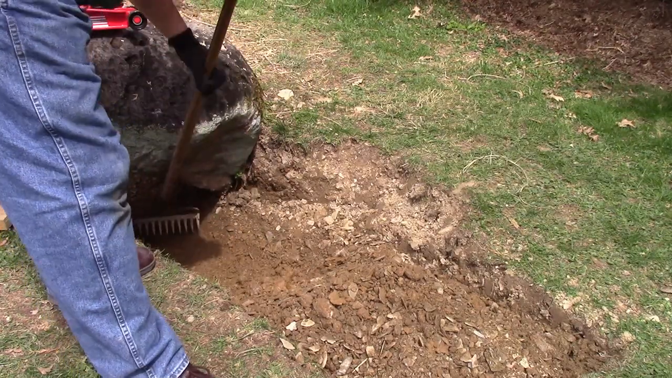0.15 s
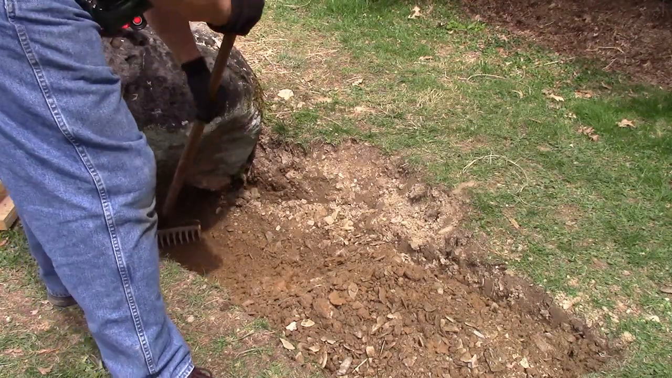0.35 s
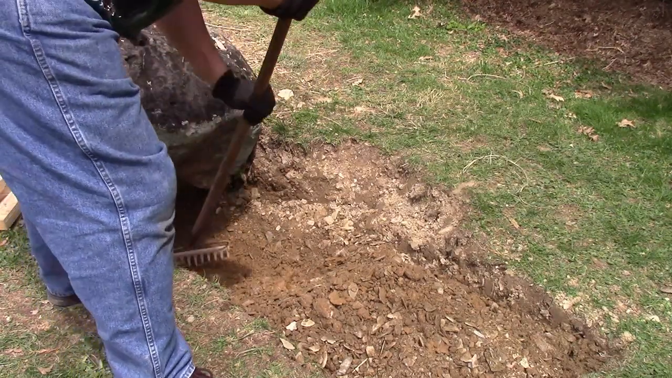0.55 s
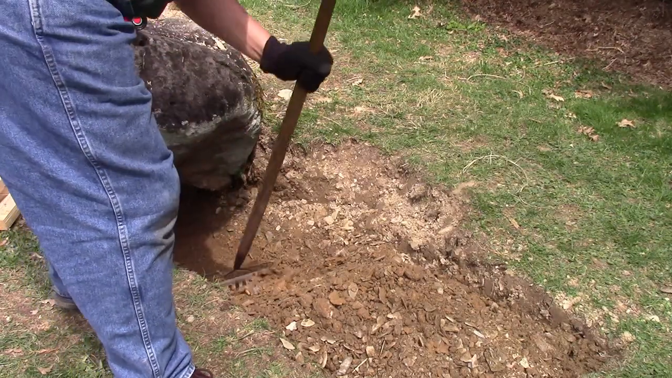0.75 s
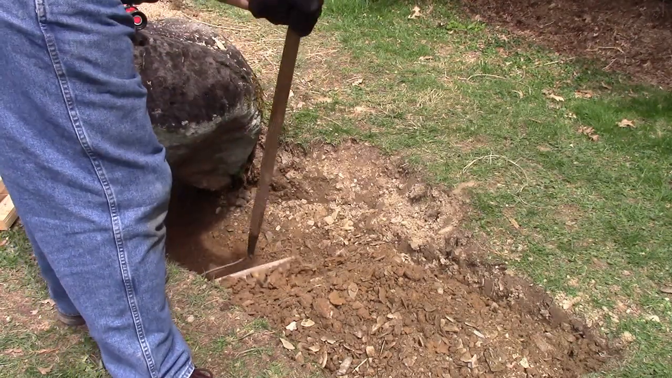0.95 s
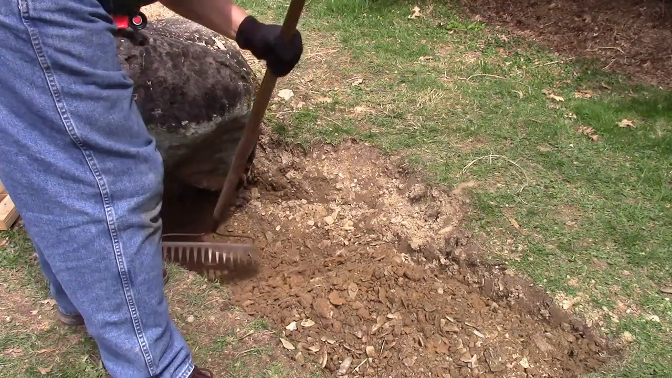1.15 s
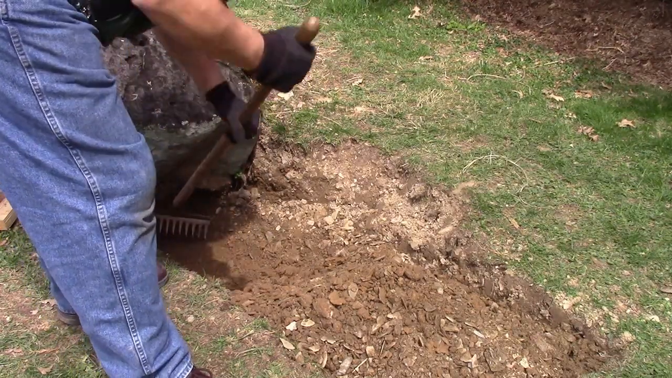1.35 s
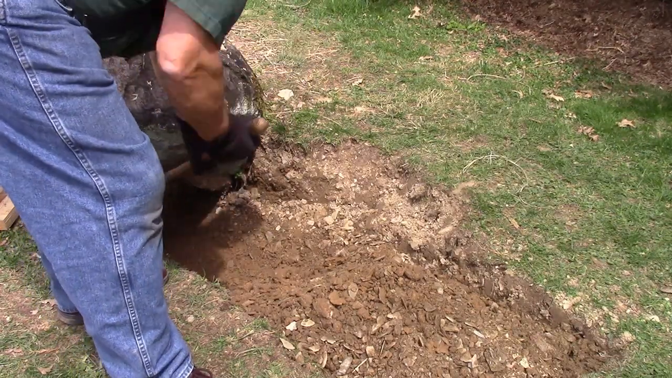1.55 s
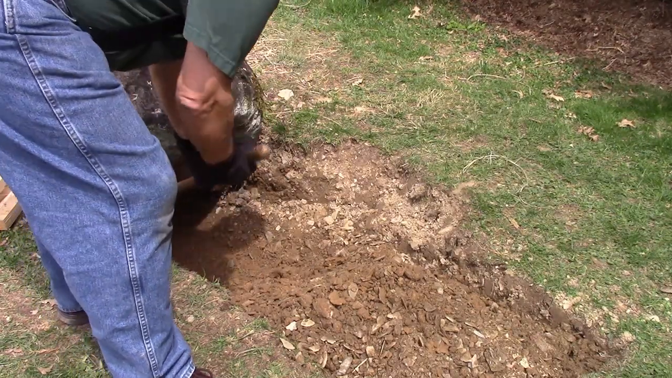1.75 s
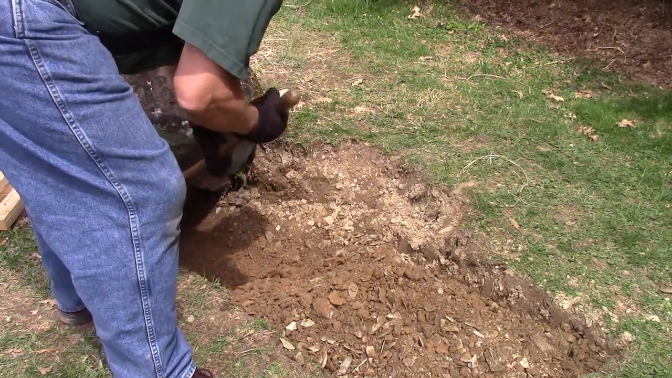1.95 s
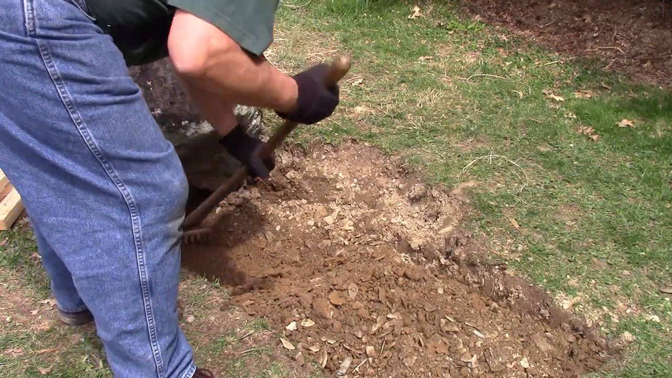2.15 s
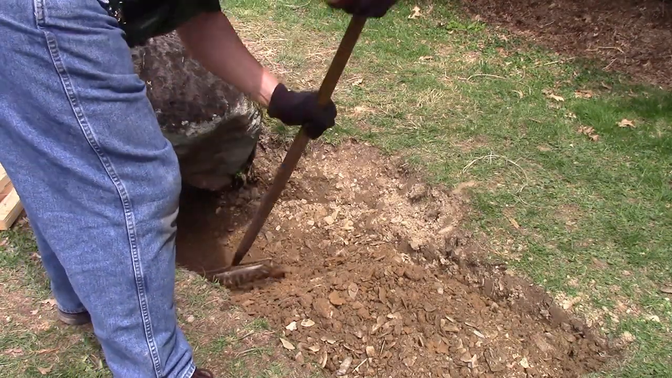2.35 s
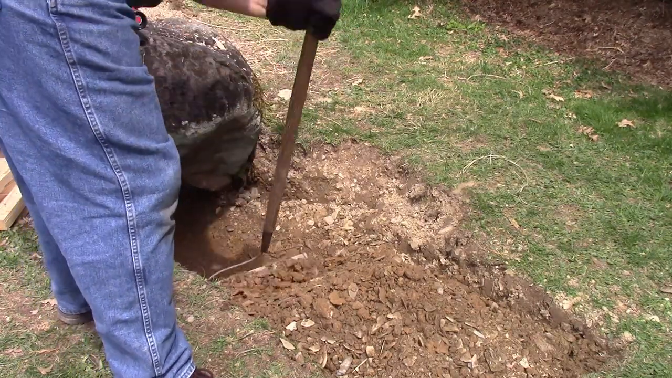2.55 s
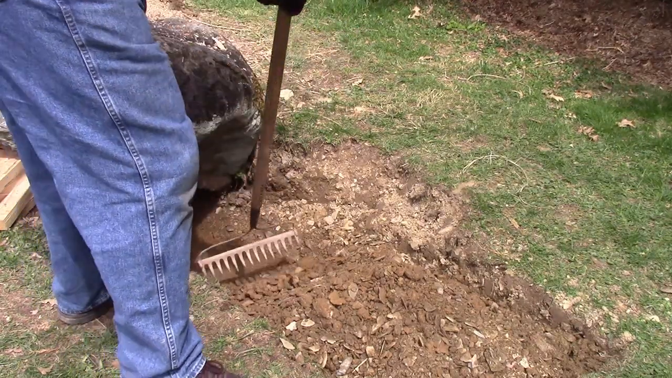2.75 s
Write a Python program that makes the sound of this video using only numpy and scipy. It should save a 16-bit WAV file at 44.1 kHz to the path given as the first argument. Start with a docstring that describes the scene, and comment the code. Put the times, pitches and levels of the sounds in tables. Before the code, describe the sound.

Close outdoor sound of a steel garden rake: one woody, metallic knock, a crunchy scrape with clicking pebbles, a near-quiet gap with light touches, then a second rasping stroke over stones, against soft yard air.

```python
"""Raking stony dirt

A steel rake on a wooden handle knocks down on hard ground, then is pulled twice through dry, stony dirt.
Streams of tiny impacts rub the tines and excite the rake's modes; denser bursts are stones that catch. Decaying
sines are slips off stones; snaps of filtered noise are pebbles; between the pulls a few stones crunch and
pebbles click. Faint bands of hiss swish, and shaped noise gives the quiet air of an open yard."""
import sys
import numpy as np
from scipy import signal
from scipy.fft import rfft, irfft
from scipy.io import wavfile
from scipy.ndimage import uniform_filter1d

SR = 44100
rng = np.random.default_rng(int(sys.argv[2]) if len(sys.argv) > 2 else 0)


def dump_mix(stems):
    """Bounce the given channels to the path in sys.argv[1] as a 16-bit WAV at rate SR."""
    frames = np.atleast_2d(stems).T  # one column per channel
    limited = np.clip(frames, -1, 1)  # hard clip at full scale
    pcm = np.round(limited * 32767).astype(np.int16)
    wavfile.write(sys.argv[1], SR, pcm)


N = 121275  # 2.75 s


def undb(db):
    """Amplitude factor of a level in dB."""
    return 10 ** (np.asarray(db) / 20)


def unit(x):
    """Scale to an RMS of 1."""
    return x / np.sqrt(np.mean(x ** 2) + 1e-20)


def band(x, lo_hz, hi_hz, order=3):
    """Causal band-pass."""
    edges = [lo_hz, min(hi_hz, SR / 2 - 1000)]
    sos = signal.butter(order, edges, "band", fs=SR, output="sos")
    return signal.sosfilt(sos, x + 1e-18)


def gains(points):
    """Gain at each frequency of the whole sound, from (f/Hz, level/dB) points."""
    hz, db = np.array(points).T
    log_hz = np.log(np.fft.rfftfreq(N, 1 / SR) + 1)
    return undb(np.interp(log_hz, np.log(hz), db))


def colour(x, points):
    """Causal minimum-phase filter that follows (f/Hz, level/dB) points."""
    cepstrum = irfft(np.log(gains(points)), N)
    # folding the cepstrum forward in time makes the filter causal
    cepstrum[1:N // 2] *= 2
    cepstrum[N // 2:] = 0
    return irfft(rfft(x) * np.exp(rfft(cepstrum)), N)


def walk(rate):
    """Smooth random wander with an RMS near 1, taking `rate` new values per second."""
    k = max(int(SR / rate), 2)
    steps = np.repeat(rng.standard_normal(N // k + 1), k)
    return unit(uniform_filter1d(steps, k)[:N])


def grains(per_s, spread_db, size):
    """Random tiny impacts, a few much larger than the rest."""
    when, strength, side = rng.random((size, 3)).T
    hit = when < per_s / SR
    return hit * undb(-spread_db * np.log(strength + 0.0092)) * np.sign(side - 0.5)


def add(out, start_s, x):
    """Mix x into out from start_s on."""
    i = max(int(start_s * SR), 0)
    out[i:i + len(x)] += x[:len(out) - i]


def tail(decay_s, size=16384):
    """Scattered reflections: noise that dies away, with unit energy."""
    fade = np.exp(-np.arange(size) / SR / decay_s)
    return unit(rng.standard_normal(size) * fade) / np.sqrt(size)


# spectrum of the outdoor air: (f/Hz, relative level/dB per Hz)
AIR_SPECTRUM = [(25, -3), (50, -4.5), (90, -13), (125, -7), (190, -9), (330, -19), (900, -22), (1750, -21),
                (5000, -30.5), (10000, -35.5), (15500, -43)]
AIR_DB, AIR_SIDE_DB = -48.5, -5.5  # the side is relative to the mid
AIR_WANDER_DB, AIR_WANDER_PER_S = 0.83, 3.37


def air():
    """Low rumble and faint hiss of the open yard: shaped noise whose level wanders, spread wide."""
    def layer():
        noise = unit(colour(rng.standard_normal(N), AIR_SPECTRUM))
        return noise * undb(AIR_WANDER_DB * walk(AIR_WANDER_PER_S))

    mid, side = layer(), layer()
    return undb(AIR_DB) * (mid + undb(AIR_SIDE_DB) * side * np.array([[1], [-1]]))


# thin whistles and swishes around the pulls: (start t/s, length t/s, centre f/Hz, width f/Hz, level/dB)
SWISH_EVENTS = [(0.907, 0.13, 4490, 170, -58.5), (0.968, 0.18, 3100, 550, -56),
                (1.1, 0.086, 2465, 49.7, -60.5), (1.125, .24, 1673, 109, -61),
                (1.861, 0.098, 4050, 1000, -53)]


def swishes():
    """Faint whistles and narrow bands of hiss that swell and fade."""
    out = np.zeros(N)
    for start, length, hz, width_hz, db in SWISH_EVENTS:
        n = int(length * SR)
        noise = rng.standard_normal(N)
        hiss = unit(band(noise, hz - width_hz / 2, hz + width_hz / 2, order=2)[-n:])
        swell = np.sqrt(2) * np.sqrt(np.hanning(n))  # keeps the average power
        add(out, start, undb(db) * hiss * swell)
    return out


# pebbles: (start t/s, peak level/dB, centre f/Hz, crumble decay t/s)
PEBBLE_CLICKS = [(0.772, -30, 12350, .001), (0.826, -18, 3500, 0.00058), (0.878, -26.5, 6100, 0.00059),
                 (1.0055, -17, 4880, 0.002), (1.004, -23, 1430, 0.0037), (1.2588, -21.5, 3150, 0.00049),
                 (2.4945, -21, 8000, .0007)]
CLICK_WIDTH = 1.63  # ratio of either band edge to the centre
BOUNCE_S, BOUNCE_DB = 0.0047, -12
CRUMBLE_DB = -14.5  # noise against the snap


def pebbles(size=2000):
    """Dry clicks (a snap and a brief crumble), each with one small bounce."""
    out, t = np.zeros(N), np.arange(size) / SR
    for start, db, hz, decay in PEBBLE_CLICKS:
        for delay, drop_db in ((0, 0), (BOUNCE_S, BOUNCE_DB)):
            crumble = rng.standard_normal(size) * np.exp(-t / decay)
            snap = signal.unit_impulse(size) + undb(CRUMBLE_DB) * crumble
            click = band(snap, hz / CLICK_WIDTH, hz * CLICK_WIDTH)
            add(out, start + delay, undb(db + drop_db) * click / np.abs(click).max())
    return out


# slips off single stones and clods: (peak t/s, envelope peak level/dB, pitch f/Hz)
STRIKE_EVENTS = [(0.303, -32, 3680), (0.307, -25.5, 932), (0.313, -32, 600), (0.318, -28, 1296),
                 (0.486, -30, 930), (0.571, -17.5, 930), (0.671, -21, 1457), (0.677, -22.5, 886),
                 (0.712, -19, 977), (0.752, -28.5, 2860), (0.784, -25.5, 2810), (0.813, -22, 1605),
                 (1.715, -27, 2850), (2.194, -25.5, 1380), (2.287, -21.5, 2980), (2.294, -25, 178),
                 (2.37, -23, 201), (2.376, -25, 1300), (2.411, -17.5, 2800), (2.486, -17.5, 1167),
                 (2.494, -19.5, 1206), (2.505, -21, 7790)]
STRIKE_DECAY_S, STRIKE_DECAY_POWER = 0.0044, 0.43  # decay at 1 kHz; how fast it shortens with pitch
STRIKE_RISE_SHARE = 0.52  # rise as a share of the decay


def strikes():
    """A tine slips off a stone or a clod: a brief knock at one pitch, shorter the higher it is."""
    out, t = np.zeros(N), np.arange(N) / SR
    for when, db, hz in STRIKE_EVENTS:
        decay = STRIKE_DECAY_S * (hz / 1000) ** -STRIKE_DECAY_POWER
        age = (t - when) / decay
        swell = np.exp(-np.where(age < 0, (age / STRIKE_RISE_SHARE) ** 2, age))
        out += undb(db) * swell * np.sin(2 * np.pi * hz * (t - when))
    return out


# modes of handle and head: (f/Hz, relative level/dB when knocked, relative level/dB when scraped, t60 t/s)
RAKE_MODES = [(192, -31, -0.5, 0.1), (246, -14.5, -3.5, 0.25), (486, -14, -7.5, 0.41),
              (693.5, -3.5, -8.5, 0.017), (799, -11, -12, 0.0069), (918, -1.5, -3.5, 0.18),
              (1184, 0, -11, 0.045), (1392, -3, -20, 0.083), (1509, -8, -12, 0.033),
              (1826, -4.5, -14, 0.03), (2394, -4, -54, 0.044), (2840, -28, -9, 0.15),
              (3180, -11.5, -13, 0.093)]
# the head lands: (start t/s, level/dB)
KNOCK_EVENTS = [(0.2018, -15.5)]
KNOCK_RISE_S, KNOCK_HOLD_S, KNOCK_FALL_S = 0.0026, 0.014, 0.0068
KNOCK_CHATTER_DB, KNOCK_CHATTER_PER_S = 3, 460
KNOCK_RING_DB = -10  # free ring against the contact


def knocks():
    """The head chatters on the ground for a moment, then the rake rings on weakly in its modes."""
    out, t = np.zeros(N), np.arange(SR // 2) / SR
    chatter = undb(KNOCK_CHATTER_DB * walk(KNOCK_CHATTER_PER_S)[:len(t)])
    contact = np.exp(-np.maximum(t - KNOCK_HOLD_S, 0) / KNOCK_FALL_S) * chatter
    for start, db in KNOCK_EVENTS:
        knock = np.zeros(len(t))
        for hz, mode_db, _, t60 in RAKE_MODES:
            free_ring = undb(KNOCK_RING_DB) * 1000 ** (-t / t60)
            tone = np.sin(2 * np.pi * (hz * t + rng.random()))
            knock += undb(mode_db) * tone * (contact + free_ring)
        knock *= np.minimum(t / KNOCK_RISE_S, 1)
        add(out, start, undb(db) * knock / np.std(knock[t < KNOCK_HOLD_S]))
    return out


# spectrum of one grain on a tine: (f/Hz, relative level/dB per Hz)
GRIT_SPECTRUM = [(70, -32), (190, 2), (320, -6.5), (600, -0.5), (950, 3.5), (1400, -4), (1900, -10.5),
                 (3000, -11), (5000, -15), (8000, -24), (11000, -32), (16000, -46.5)]
# the rake rings more freely while sliding than when a stone holds it
DRAG_RING_DB, CATCH_RING_DB = -5.5, -11  # ring against the crack


def rake_response(ring_db, size=8192):
    """One grain on a tine: a dry crack and the ring of the rake's modes."""
    t = np.arange(size) / SR
    crack = colour(signal.unit_impulse(N), GRIT_SPECTRUM)[:size]
    ring = np.zeros(size)
    for hz, _, mode_db, t60 in RAKE_MODES:
        ring += undb(mode_db) * unit(np.sin(2 * np.pi * hz * t) * 1000 ** (-t / t60))
    return unit(crack) + undb(ring_db) * unit(ring)


STONE_LOW_HZ, STONE_HIGH_HZ = 827.5, 8820
STONE_DECAY_S, STONE_RING_DB = 0.0033, -4.5


def stone(count=7, size=1024):
    """The brief ring of one stone at a few pitches of its own, different every time."""
    t = np.arange(size) / SR
    place_in_range = (np.arange(count) + rng.random(count)) / count
    hz = STONE_LOW_HZ * (STONE_HIGH_HZ / STONE_LOW_HZ) ** place_in_range
    ring = np.cos(2 * np.pi * hz[:, None] * t).sum(axis=0) * np.exp(-t / STONE_DECAY_S)
    return signal.unit_impulse(size) + undb(STONE_RING_DB) * ring * 2 * np.pi / (STONE_DECAY_S * SR)


# edges between thud, body, rasp and fizz: (f/Hz)
BAND_EDGES_HZ = [125, 400, 1800, 6000, 16000]
# stones crunch under the tines as the head lands, catches and slips:
# (start t/s, length t/s, thud level/dB, body level/dB, rasp level/dB, fizz level/dB)
CATCH_EVENTS = [(0.2001, 0.0053, -28.5, -16.5, -28.5, -37), (0.207, 0.0097, -30, -27, -20.5, -36.5),
                (0.215, 0.028, -35.5, -29, -37, -57), (0.293, 0.025, -39, -35.5, -38.5, -50.5),
                (0.521, 0.021, -43.5, -37.5, -47.5, -58), (0.567, 0.0068, -27, -25.5, -45, -65),
                (0.664, 0.014, -26.5, -27, -35, -56), (0.701, 0.013, -39, -32, -50, -62),
                (0.738, 0.021, -55, -33, -42.5, -54), (0.777, 0.0085, -33, -29, -30.5, -34.5),
                (0.803, 0.0084, -44, -27, -32.5, -40), (0.819, 0.011, -38.5, -25.5, -35, -40.5),
                (1.628, 0.011, -55, -37.5, -32, -44.5), (1.637, 0.027, -45.5, -41.5, -40.5, -53),
                (1.709, 0.018, -48.5, -37, -36, -58), (1.734, 0.045, -52, -52, -49, -56.5),
                (1.948, 0.018, -56, -44.5, -41.5, -67), (1.999, 0.023, -51.5, -39, -41, -58),
                (2.069, 0.026, -44, -33.5, -36.5, -61), (2.131, 0.019, -46, -39.5, -37.5, -51),
                (2.188, 0.0069, -40, -46, -38, -53), (2.282, 0.011, -28, -25, -27, -40),
                (2.404, 0.0095, -34, -36, -27, -32), (2.444, 0.0095, -41, -23.5, -23, -29),
                (2.48, 0.013, -55, -26, -31.5, -37), (2.575, 0.014, -62, -38, -46.5, -52.5)]
CATCH_GRAINS_PER_S, CATCH_SPREAD_DB = 5000, 2
CATCH_RISE_SHARE, CATCH_FALL_SHARE = 0.25, 0.86  # shares of the length


def catches(rake, size=12000):
    """Each stone grinds past a tine in a short burst of impacts that ring both rake and stone."""
    out, t = np.zeros(N), np.arange(size) / SR
    for start, length, *levels in CATCH_EVENTS:
        rise = np.minimum(t / (CATCH_RISE_SHARE * length), 1) ** 2
        fall = np.exp(-np.maximum(t - length / 2, 0) / (CATCH_FALL_SHARE * length))
        impacts = grains(CATCH_GRAINS_PER_S, CATCH_SPREAD_DB, size) * rise * fall
        burst = signal.fftconvolve(impacts, signal.fftconvolve(rake, stone()))[:size]
        energy = np.sqrt(length * SR / size)  # levels refer to the burst's length
        for db, lo, hi in zip(levels, BAND_EDGES_HZ, BAND_EDGES_HZ[1:]):
            add(out, start, undb(db) * unit(band(burst, lo, hi)) * energy)
    return out


CRUMB_SPREAD_DB, CRUMB_TILT_DB_PER_OCT = 3.8, -0.5
CRUMB_CYCLES = 4  # cycles in one decay time


def crumbs(low_hz, high_hz, per_s, size=2048):
    """Small stones knock together: decaying sines, each with its own pitch and strength."""
    out, t = np.zeros(N), np.arange(size) / SR
    for when, pitch, strength in rng.random((int(per_s * N / SR), 3)):
        hz = low_hz * (high_hz / low_hz) ** pitch
        tilt_db = CRUMB_TILT_DB_PER_OCT * np.log2(hz / low_hz)
        db = tilt_db - CRUMB_SPREAD_DB * np.log(strength + 0.005)
        add(out, when * N / SR, undb(db) * np.sin(2 * np.pi * hz * t) * np.exp(-t * hz / CRUMB_CYCLES))
    return unit(out)


# steady drag of the tines, one list per pull: (t/s, body level/dB, gritty treble level/dB)
PULL_CURVES = [
    [(0.44, -55.5, -75), (0.47, -43.5, -55), (0.55, -38.5, -51), (0.59, -32.5, -48), (0.65, -36, -41),
     (0.70, -32.5, -37.5), (0.74, -43, -45), (0.835, -36.5, -37.5), (0.87, -46.5, -43.5),
     (0.91, -48.5, -54.5), (0.99, -56, -55)],
    [(1.93, -68, -58), (2.06, -48, -48), (2.15, -48, -49.5), (2.18, -34, -37.5), (2.27, -36, -41),
     (2.35, -32, -37), (2.43, -32, -39), (2.505, -40, -34), (2.535, -50.5, -49), (2.57, -43.5, -58),
     (2.64, -72, -52)],
]
DRAG_GRAINS_PER_S, DRAG_SPREAD_DB = 2400, 2.5
DRAG_JUDDER_DB, JUDDER_PER_S = 2.5, 130
# loose crumbs and clods thrown up by the tines, against grit and body
CRUMBS_PER_S, CRUMBS_DB, CLODS_DB = 340, -3, -8


def drag(rake):
    """Tines plough the dirt: a juddering stream of grains rings the rake, with crumbs and clods on top."""
    out, t = np.zeros(N), np.arange(N) / SR
    judder = undb(DRAG_JUDDER_DB * walk(JUDDER_PER_S))
    impacts = grains(DRAG_GRAINS_PER_S, DRAG_SPREAD_DB, N) * judder
    scrape = signal.fftconvolve(impacts, rake)[:N]
    body = unit(band(scrape, BAND_EDGES_HZ[0], BAND_EDGES_HZ[2]))
    grit = unit(band(scrape, BAND_EDGES_HZ[2], BAND_EDGES_HZ[4]))
    clods = crumbs(low_hz=666, high_hz=1590, per_s=CRUMBS_PER_S / 2)
    small = crumbs(low_hz=2253, high_hz=10370, per_s=CRUMBS_PER_S)
    body = unit(body + undb(CLODS_DB) * clods)
    grit = unit(grit + undb(CRUMBS_DB) * small)
    for pull in PULL_CURVES:
        s, body_db, grit_db = np.array(pull).T
        moving = (t > s[0]) * (t < s[-1])
        level_body, level_grit = undb(np.interp(t, s, body_db)), undb(np.interp(t, s, grit_db))
        out += (body * level_body + grit * level_grit) * moving
    return out


# sound scattered differently to the two ears: (f/Hz, side level/dB)
SCATTER_SIDE = [(150, -14.5), (700, -20), (2500, -18), (10000, 5.5)]
# how much louder the left is than the right: (f/Hz, level/dB)
LEFT_LEAN = [(1000, 0.3), (10000, 2.5)]
SCATTER_S, RIGHT_LAG_S = 0.00232, 0.000018
YARD_T60_S, YARD_DB = 0.3, -26.5


def place(x):
    """Slightly to the left; ground and boulder scatter the sound, treble most, and the yard answers faintly."""
    mid = rfft(x)
    scatter_phase = np.exp(1j * np.angle(rfft(tail(SCATTER_S), N)))
    side = mid * scatter_phase * gains(SCATTER_SIDE)
    lag = np.exp(-2j * np.pi * np.fft.rfftfreq(N, 1 / SR) * RIGHT_LAG_S)
    lean = np.sqrt(gains(LEFT_LEAN))  # half on each ear
    near = np.array([irfft((mid + side) * lean, N), irfft((mid - side) * lag / lean, N)])
    decay_s = YARD_T60_S / np.log(1000)
    yard = np.array([signal.fftconvolve(x, tail(decay_s))[:N] for _ in range(2)])
    return near + undb(YARD_DB) * yard


def scene():
    """Yard, stones and rake together; each source gets its own random scatter and yard reflections."""
    sources = [swishes(), pebbles(), strikes(), knocks(),
               catches(rake_response(CATCH_RING_DB)), drag(rake_response(DRAG_RING_DB))]
    return air() + sum(place(x) for x in sources)


TOP_HZ = 15700


def record(dry):
    """A steep elliptic low-pass cuts the top."""
    return signal.sosfilt(signal.ellip(10, 0.2, 70, TOP_HZ, fs=SR, output="sos"), dry)


dry = scene()
out = record(dry)
dump_mix(out)
```